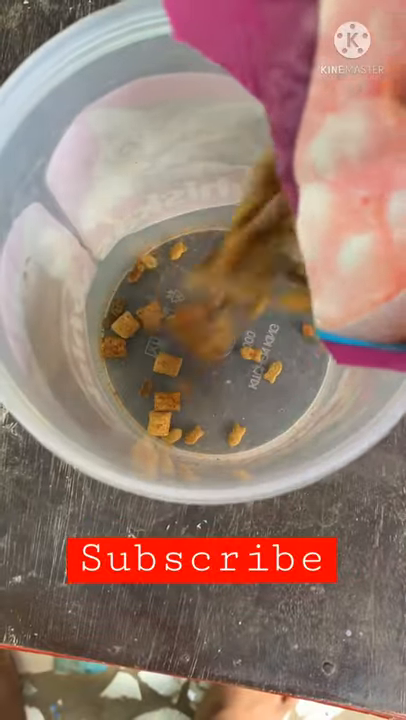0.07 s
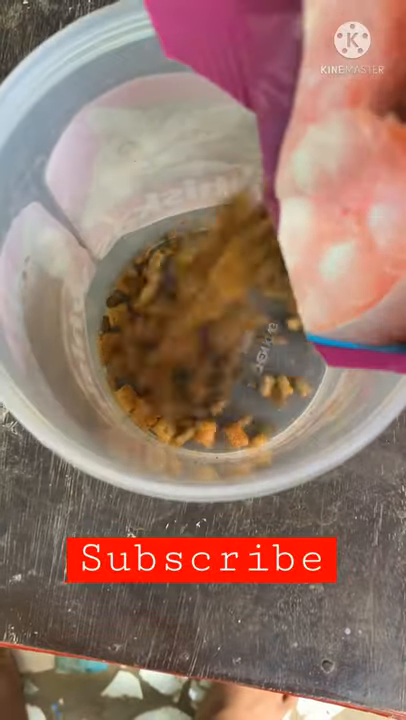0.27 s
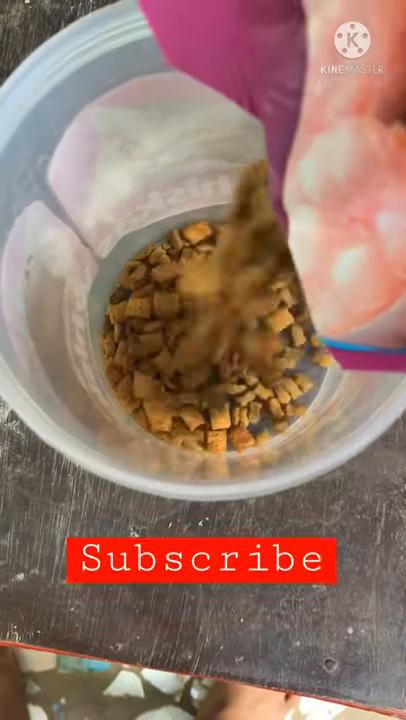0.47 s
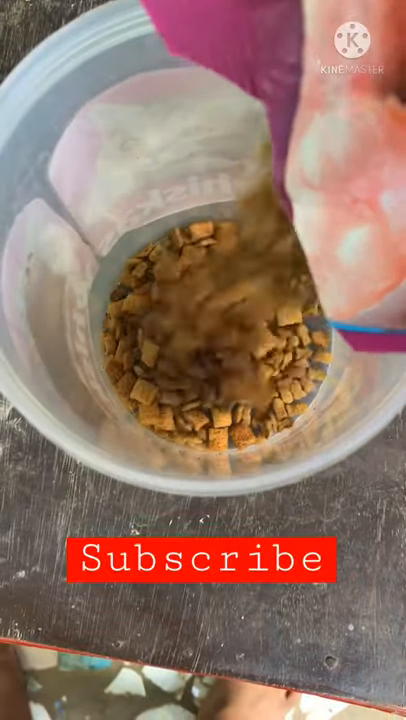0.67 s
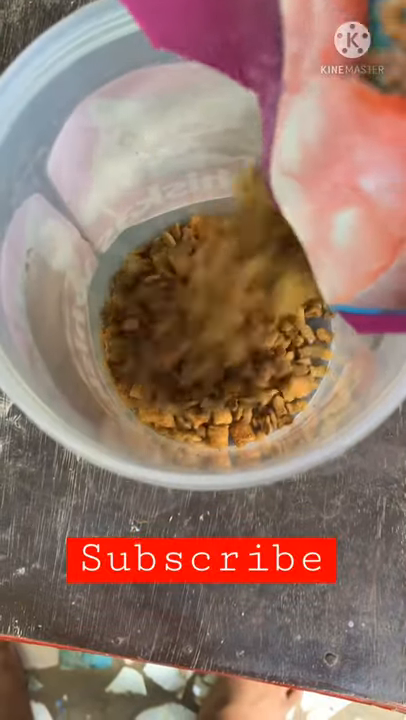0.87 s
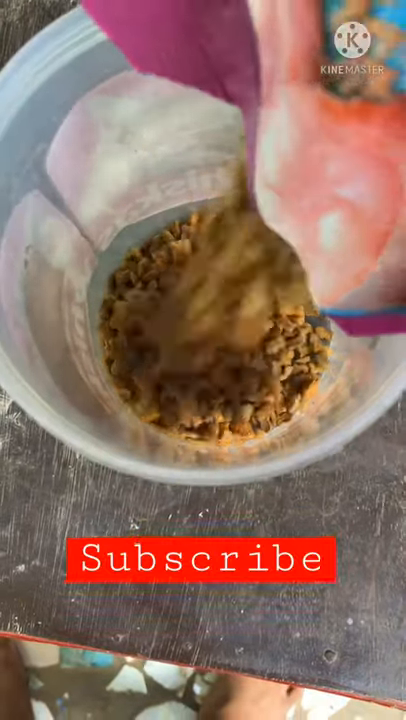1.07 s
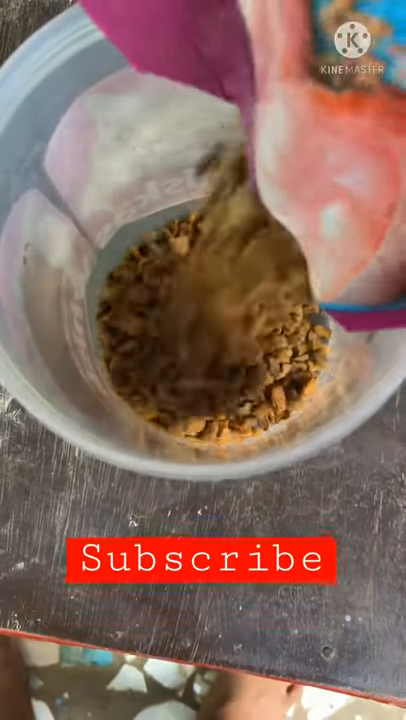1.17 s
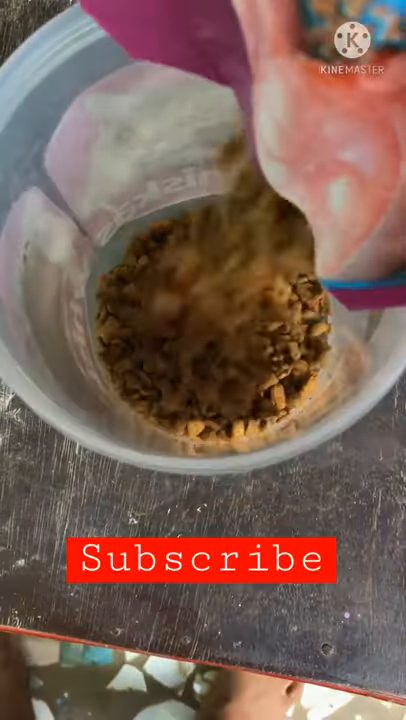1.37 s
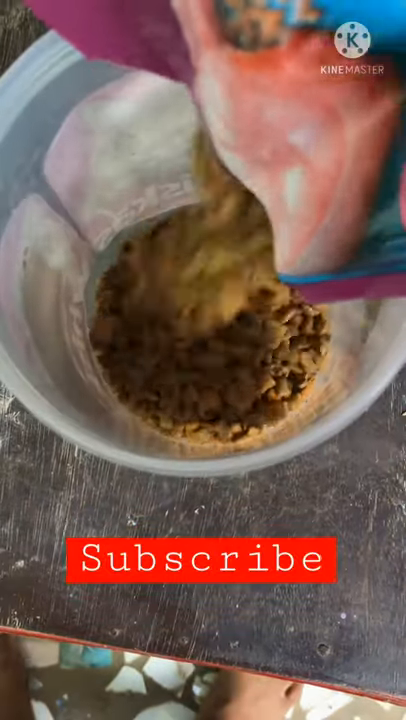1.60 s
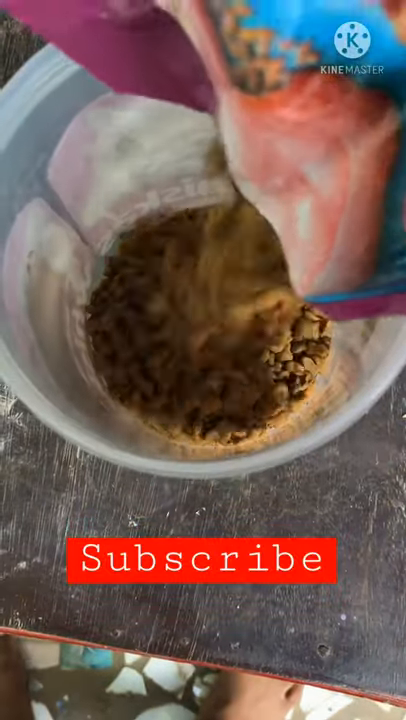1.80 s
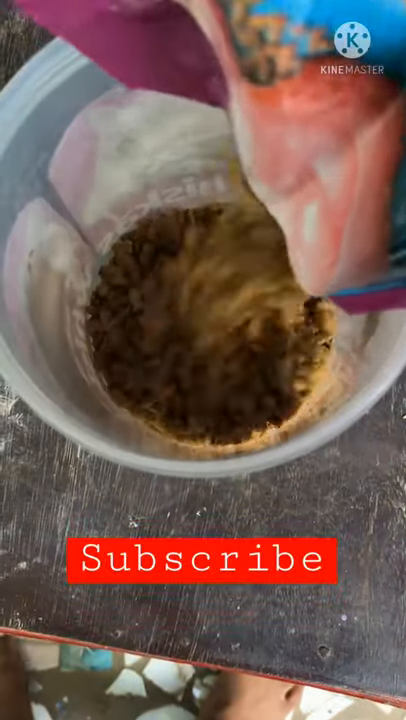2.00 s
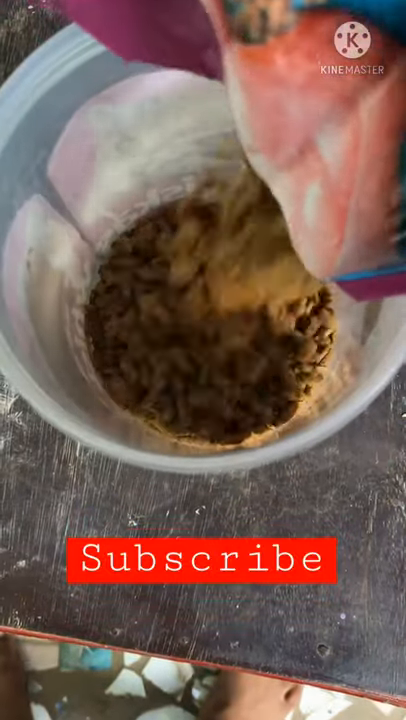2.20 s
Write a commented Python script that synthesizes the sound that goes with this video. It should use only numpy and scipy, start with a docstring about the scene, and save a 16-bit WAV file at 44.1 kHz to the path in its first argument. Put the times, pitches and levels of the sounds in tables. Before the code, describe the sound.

Dry pet food pours from a crinkling bag into an empty plastic tub, very close: first a loud hollow clatter on the bare floor, then a duller, dense patter of pieces clicking on the growing heap.

```python
"""Dry pet food into a plastic tub

Dry pet food pours from a bag into a plastic tub, close to the microphone. At first the pieces strike the
bare floor: damped modes ring and thump under noisy cracks. As a heap builds up the tub is muffled, and
the sound turns into a patter of coloured random contacts with short clicks of piece on piece. The bag
rumbles (filtered noise) and snaps, a wavering low tone comes and goes, and the loudest peaks overload."""
import sys
import numpy as np
from scipy import signal
from scipy.fft import rfft, irfft, next_fast_len
from scipy.io import wavfile
from scipy.ndimage import map_coordinates

SR = 44100
rng = np.random.default_rng(int(sys.argv[2]) if len(sys.argv) > 2 else 0)


def to_wav(s):
    """Save 16-bit WAV."""
    ch = np.atleast_2d(s).T  # columns
    pcm = np.round(np.clip(ch, -1, 1) * 32767)  # PCM
    wavfile.write(sys.argv[1], SR, pcm.astype(np.int16))


N = 99225  # samples, 2.25 s
AGE = np.arange(SR // 8) / SR  # seconds since the start of a single hit


def amp(db):
    """Decibels to gain."""
    return 10 ** (np.asarray(db) / 20)


def unit(x):
    """Scale to rms 1."""
    return x / np.sqrt(np.mean(x ** 2) + 1e-20)


def burst(x, size):
    """Scale a hit to rms 1 over its first samples."""
    return x / np.sqrt(np.mean(x[:size] ** 2) + 1e-20)


def level(rows):
    """Gain per sample from (time_s, level_db) points."""
    return amp(np.interp(np.arange(N) / SR, *np.transpose(rows)))


def fade(t60, attack=1e-5):
    """Quick rise and exponential decay, both times in seconds."""
    decay = np.exp(-np.log(1000) * AGE / t60)
    return decay * (1 - np.exp(-AGE / attack))


def add(track, s, sound):
    """Mix a sound into the track at a time in seconds."""
    i = int(np.clip(round(s * SR), 0, N))
    track[i:i + len(sound)] += sound[:N - i]


def response(points, size=4096):
    """Minimum-phase impulse response of a (freq_hz, gain_db) colour, built by folding its cepstrum."""
    hz, db = np.transpose(points)
    log_freq = np.log(np.fft.rfftfreq(size, 1 / SR) + 1)
    gain = amp(np.interp(log_freq, np.log(hz), db))
    cepstrum = irfft(np.log(gain))
    cepstrum[1:size // 2] *= 2
    cepstrum[size // 2 + 1:] = 0
    return irfft(np.exp(rfft(cepstrum)))


def through(x, answer):
    """Pass a sound through an impulse response."""
    return signal.fftconvolve(x, answer)[:len(x)]


def wobble(per_s):
    """A smooth random curve without extreme swings."""
    curve = map_coordinates(rng.standard_normal(N), [np.arange(N) * per_s / SR])
    return np.clip(curve, -2, 2)


def contacts(per_s, spread_db):
    """Random impulses of uneven size and either sign."""
    hit = rng.random(N) < per_s / SR
    sign = rng.choice([-1, 1], N)
    return hit * sign * amp(spread_db * np.clip(rng.standard_normal(N), -2, 2))


def scratch(t60, colour, rough_db=4, points_per_s=3000):
    """A rough edge touching: a short dying spray of noise, uneven in level and coloured."""
    roughness = map_coordinates(rng.standard_normal(len(AGE)), [AGE * points_per_s], order=1)
    noise = rng.standard_normal(len(AGE)) * amp(rough_db * roughness)
    return through(noise * fade(t60), colour)


def ping(hz, t60, attack):
    """One heavily damped ring, started at a random phase."""
    return np.sin(2 * np.pi * (hz * AGE + rng.random())) * fade(t60, attack)


# a low hum that swells and fades, perhaps the surface under the tub: time_s, level_db
HUM_LEVEL = [(.09, -51), (.14, -35.5), (.31, -36), (.36, -54), (.48, -40.5), (.65, -35.5), (.82, -54),
             (1.2, -41), (1.4, -53), (1.75, -40), (2.25, -58)]
HUM_HZ, HUM_WAVER_HZ = 128.4, 1.83


def hum():
    """One low tone, slightly unsteady in pitch."""
    pitch = HUM_HZ + HUM_WAVER_HZ * wobble(10.1)
    tone = np.sin(2 * np.pi * np.cumsum(pitch) / SR)
    return level(HUM_LEVEL) * unit(tone)


# food shifting in the handled bag: time_s, level_db
BAG_LEVEL = [(0, -32), (.09, -35), (.15, -29.5), (.35, -28), (.55, -39.5), (1.2, -31.5), (1.7, -34),
             (2.1, -31.5), (2.25, -32.5)]
# colour of that rumble: freq_hz, relative gain_db
RUMBLE_COLOUR = [(20, -6), (45, -6.5), (70, -2.5), (100, -8), (130, -5), (200, -3), (400, -9), (800, -9.5),
                 (1500, -11), (2500, -19.5), (6000, -33.5), (16000, -41)]
# sharp snaps, probably creases of the bag: start_s, level_db before the SNAP_DB trim, pitch_hz
SNAP_EVENTS = [(0.0602, -32.5, 8300), (0.0695, -40, 6950), (0.083, -42, 9660), (0.1044, -35.5, 10250),
               (.606, -20, 12800), (0.9953, -16.5, 8900), (1.0385, -19.5, 9150), (1.521, -22, 9100),
               (1.57, -21, 7200), (1.6921, -25, 7600), (1.961, -24.5, 9000), (1.995, -24, 12000),
               (2.092, -30, 11900)]
# colour of a snap's noise: freq_hz, relative gain_db
SNAP_COLOUR = [(200, -28), (1300, -3), (3000, 11), (6000, 2.5), (9000, -1), (15000, -7.5)]
SNAP_DB, SNAP_T60_S = 4.5, 0.002


def bag(ping_db=-5):
    """The bag rumbles as the food shifts; each snap is a scratch with a very short high ring."""
    rumble = through(rng.standard_normal(N), response(RUMBLE_COLOUR))
    out, colour = level(BAG_LEVEL) * unit(rumble), response(SNAP_COLOUR)
    for s, db, hz in SNAP_EVENTS:
        crackle = burst(scratch(0.015, colour), size=88)
        ring = burst(ping(hz, SNAP_T60_S, .0002), size=88)
        add(out, s, amp(db + SNAP_DB) * (crackle + amp(ping_db) * ring))
    return out


# dull knocks, probably the bag and clumps landing: start_s, level_db before lift_db, pitch_hz, t60_s
KNOCK_EVENTS = [(0.106, -24, 247, 0.023), (0.994, -11.5, 1310, 0.02), (1.511, -25, 1090, .012),
                (1.9982, -19.5, 1450, 0.0075), (2.001, -17, 850, 0.0085), (1.926, -38, 69, .18),
                (2.096, -35, 65, 0.16)]


def knocks(lift_db=5, skirt_db=-22, scuff_db=-4):
    """Short hollow bumps: a damped ring blurred by a scuff around the same pitch."""
    out = np.zeros(N)
    for s, db, hz, t60 in KNOCK_EVENTS:
        colour = [(hz / 2, skirt_db / 2), (hz, 0), (hz * 2, skirt_db / 2), (hz * 10, 2 * skirt_db)]
        scuff = scratch(t60, response(colour))
        scuff = scuff / np.abs(scuff).max()
        add(out, s, amp(db + lift_db) * (ping(hz, t60, t60 / 20) + amp(scuff_db) * scuff))
    return out


# pieces landing and sliding on the heap, also the base level of the small random clicks: time_s, level_db
HEAP_LEVEL = [(0, -30), (.2, -83), (.3, -27.5), (.8, -27.5), (1.1, -29), (1.4, -32.5), (1.7, -29.5),
              (1.98, -33), (2.07, -32.5), (2.25, -30.5)]
# colour of those pieces: freq_hz, relative gain_db
PATTER_COLOUR = [(100, -12.5), (250, 3.5), (420, -1), (580, 3.5), (800, -1.5), (1500, 2.5), (2200, -1.5),
                 (3000, 0.5), (4200, -7.5), (4950, -15.5), (5800, -4), (8000, -8), (10500, -11.5),
                 (15700, -14)]
PATTER_PER_S, PATTER_SPREAD_DB = 4000, 4
# fine crumbs sliding over each other and out of the bag: time_s, level_db
CRUMB_LEVEL = [(0, -69), (.2, -45.5), (.3, -28), (.78, -49), (.98, -38), (1.15, -31.5), (1.3, -33),
               (1.37, -29.5), (1.44, -32), (1.51, -34), (1.57, -30), (1.69, -32.5), (1.8, -34),
               (1.94, -31.5), (2.06, -35), (2.14, -31.5), (2.25, -30.5)]
# colour of the crumbs: freq_hz, relative gain_db
CRUMB_COLOUR = [(1000, -4), (3000, -44), (5700, 0), (7600, -6), (9300, 1.5), (10500, -2.5), (11700, 1.5),
                (13500, 3.5), (15700, -1.5)]
CRUMBS_PER_S, CRUMB_SPREAD_DB = 1100, 3.5


def patter(clump_db=3, clumps_per_s=200, crumb_clump_db=2):
    """Many tiny contacts of pieces and crumbs on the heap, swelling together in clumps."""
    clumps = wobble(clumps_per_s)
    piece_hits = contacts(PATTER_PER_S, PATTER_SPREAD_DB) * amp(clump_db * clumps)
    crumb_hits = contacts(CRUMBS_PER_S, CRUMB_SPREAD_DB) * amp(crumb_clump_db * clumps)
    pieces = unit(through(piece_hits, response(PATTER_COLOUR)))
    crumbs = unit(through(crumb_hits, response(CRUMB_COLOUR)))
    return level(HEAP_LEVEL) * pieces + level(CRUMB_LEVEL) * crumbs


# colour of hard piece edges touching: freq_hz, relative gain_db
CRACK_COLOUR = [(500, -12), (2000, 1), (4300, 7), (5000, 1), (5700, 4.5), (7500, 0), (8500, 2.5),
                (10400, -6.5), (11500, -2.5), (15500, -3.5)]


def crack(t60):
    """The noisy contact of a hard edge, shared by clicks, bounces and strikes."""
    return scratch(t60, response(CRACK_COLOUR))


REBOUND_S = .0025  # base delay of a second touch, scaled at random each time
# piece hitting piece on the heap: start_s, level_db before the CLICK_DB trim, pitch_hz
CLICK_EVENTS = [(0.9666, -12, 4360), (1.097, -30, 3290), (1.1513, -18, 3870), (1.178, -17.5, 5830),
                (1.2284, -16.5, 3850), (1.2349, -13, 3800), (1.248, -16.5, 3900), (1.2688, -31, 3920),
                (1.2826, -14, 4000), (1.2993, -25, 3800), (1.3517, -16, 5670), (1.3686, -18, 4350),
                (1.3846, -14.5, 3450), (1.387, -17.5, 3800), (1.413, -15, 3600), (1.4167, -14.5, 3900),
                (1.423, -20, 3950), (1.4465, -23, 4200), (1.453, -16, 3920), (1.4557, -17, 3980),
                (1.5027, -20.5, 4020), (1.5211, -16.5, 3800), (1.5494, -14.5, 3800), (1.5667, -26, 4370),
                (1.594, -17, 3650), (1.6037, -19, 3870), (1.614, -20, 3940), (1.63, -20, 3800),
                (1.6787, -15, 3900), (1.6935, -13.5, 5900), (1.7055, -23, 3720), (1.722, -22, 3730),
                (1.768, -22, 3900), (1.779, -25, 3870), (1.786, -16, 4060), (1.8273, -19, 3700),
                (1.855, -16.5, 3760), (1.8709, -17, 4120), (1.9074, -18, 4160), (1.9356, -13, 3620),
                (1.94, -15.5, 3830), (1.9625, -20, 3870), (1.9993, -22.5, 3130), (2.0916, -15.5, 3900),
                (2.142, -18.5, 3700), (2.1458, -20, 3720), (2.2381, -21, 3720), (2.2422, -20, 4030)]
CLICK_DB, CLICK_T60_S, CLICK_ATTACK_S = -0.5, 0.0027, .0004
# fainter clicks at random: mean rate, mean level relative to HEAP_LEVEL, middle pitch
SMALL_CLICKS_PER_S, SMALL_CLICK_DB, SMALL_CLICK_HZ = 320, -1, 3800


def clicks(crack_db=-9, spread_db=3, pitch_spread=0.19, again_db=-13):
    """Piece on piece: a few cycles of ring and a tick, then a lighter touch at another pitch."""
    out, heap = np.zeros(N), level(HEAP_LEVEL)
    rows = [(s, amp(db + CLICK_DB), hz) for s, db, hz in CLICK_EVENTS]
    for i in np.flatnonzero(rng.random(N) < SMALL_CLICKS_PER_S / SR):
        size, shift = np.clip(rng.standard_normal(2), -2, 2)
        gain = heap[i] * amp(SMALL_CLICK_DB + spread_db * size)
        rows.append((i / SR, gain, SMALL_CLICK_HZ * np.exp(pitch_spread * shift)))
    for s, gain, hz in rows:
        again_s = REBOUND_S * (.5 + 2 * rng.random())
        again_hz = hz * np.exp(pitch_spread * rng.uniform(-2.9, 1))
        for delay, db, pitch in ((0, 0, hz), (again_s, again_db, again_hz)):
            ring = burst(ping(pitch, CLICK_T60_S, CLICK_ATTACK_S), size=88)
            tick = burst(crack(.0045), size=88)
            add(out, s + delay, gain * amp(db) * (ring + amp(crack_db) * tick))
    return out


# modes of the tub before random variation and damping: freq_hz, relative level_db, t60_s
TUB_MODES = [(329, -7, 0.069), (411, 1.5, 0.069), (445, -9.5, 0.025), (608.6, -10.5, 0.074),
             (977, -19, 0.051), (1037, -18.5, 0.045), (1348, -15.5, 0.035), (1960, -2.5, 0.023),
             (2186, 5.5, 0.017), (2430, -3, 0.012), (2830, -2, 0.019), (3206, -1, 0.017), (3750, -4, 0.011),
             (4240, -6.5, 0.014)]
THUMP_BELOW_HZ = 800  # modes below thump, the others ring
RING_ATTACK_S, THUMP_ATTACK_S = 0.00087, 0.0003


def tub(low, attack, damping=1, vary_db=2.0, detune=0.0056):
    """The tub's low or high modes as decaying sines, excited differently at each spot."""
    out = np.zeros(len(AGE))
    for hz, db, t60 in TUB_MODES:
        if (hz < THUMP_BELOW_HZ) == low:
            size, shift, phase = rng.standard_normal(3)
            mode = np.sin(2 * np.pi * (hz * (1 + detune * shift) * AGE + phase))
            out += amp(db + vary_db * size) * fade(t60 / damping, attack) * mode
    return out


# small pieces bouncing on the floor that is still bare: time_s, level_db
BOUNCE_LEVEL = [(.215, -67), (.25, -21.5), (.34, -18.5), (.41, -22), (.45, -11), (.49, -19.5), (.7, -25.5),
                (.86, -27), (1.05, -28), (1.2, -39), (1.6, -51), (2.25, -63)]
# the tub's low boom under the falling stream: time_s, level_db
BOOM_LEVEL = [(0, -45), (.2, -52), (.33, -30), (.6, -29), (1, -33), (1.3, -31), (1.5, -37), (2.25, -41)]
BOUNCES_PER_S, BOUNCE_SPREAD_DB = 700, 5.5


def bounces(crack_db=-4, count=12):
    """Lighter rebounds at several spots of the floor, over the boom of the tub's low modes."""
    rattle, boom = np.zeros(N), np.zeros(N)
    for spot in range(count):
        taps = contacts(BOUNCES_PER_S / count, BOUNCE_SPREAD_DB)
        rattle += unit(through(taps, tub(False, RING_ATTACK_S, damping=0.99, detune=0.033)))
        rattle += amp(crack_db) * unit(through(taps, crack(0.0025)))
        boom += unit(through(taps, tub(True, THUMP_ATTACK_S)))
    return level(BOUNCE_LEVEL) * unit(rattle) + level(BOOM_LEVEL) * unit(boom)


# pieces striking the tub floor, levels before the trims below:
# start_s, floor ring_db, tub thump_db, contact crack_db
STRIKE_EVENTS = [(0.22, -8.5, -21, -13.5), (0.228, -4, -13.5, -18), (0.246, -7, -20.5, -13.5),
                 (0.253, -13, -19.5, -13), (0.267, -3.5, -23, -9.5), (0.273, -10, -25, -16),
                 (0.283, -14, -22, -15), (0.291, -4, -36, -18), (0.297, -21, -18, -10),
                 (0.303, -17, -20.5, -22), (0.324, -13, -48, -13), (0.332, -5.5, -23.5, -11),
                 (0.34, -10, -39, -8.5), (0.347, -9.5, -15, -13.5), (0.354, -7.5, -20, -12.5),
                 (0.364, -13, -39, -18.5), (0.371, -33, -46, -18), (0.381, -6.5, -18.5, -11),
                 (0.388, -9, -27, -18), (0.404, -17, -35, -29), (0.428, -12, -35, -22),
                 (0.439, -10, -22, -11.5), (0.446, -7.5, -15, -15), (0.452, -7, -15, -16),
                 (0.461, -13, -37, -23), (0.482, -17, -32, -21), (0.506, -19, -29, -26),
                 (0.518, -16, -27, -12.5), (0.526, -14.5, -17.5, -19), (0.536, -15, -24, -19),
                 (0.562, -17, -23, -35), (0.581, -14.5, -32, -14.5), (0.596, -19, -25, -15.5),
                 (0.625, -14.5, -28, -19), (0.653, -14, -39, -18), (0.664, -8.5, -13, -17),
                 (0.683, -10, -23, -10), (0.694, -15, -18, -16), (0.719, -17, -19, -17.5),
                 (0.741, -12, -31, -18), (0.751, -16, -21, -21), (0.766, -18, -26, -36),
                 (0.7981, -11.5, -16.5, -16), (0.81, -14, -18, -14), (0.824, -18, -28, -23),
                 (0.833, -17, -34, -20.5), (0.889, -23.5, -32, -22), (0.924, -15.5, -19.5, -26),
                 (0.954, -21, -20.5, -17.5), (0.983, -28, -25.5, -22), (1.04, -20, -21, -32.5),
                 (1.079, -36, -20.5, -26.5)]
RING_DB, THUMP_DB, CRACK_DB = -3.5, -1.5, -1
CRACK_T60_S = 0.014  # on the bare floor
# the growing heap shortens the floor's ring and deadens the rebounds
DAMPING_PER_S, REBOUND_LOSS_DB_PER_S = 0.62, 4.5
REBOUND_DB = -2.5  # at the first strike


def strikes():
    """Each hard landing cracks, rings the floor and thumps the tub; the piece tips over and touches again."""
    out = np.zeros(N)
    for s, ring_db, thump_db, crack_db in STRIKE_EVENTS:
        poured_s = s - STRIKE_EVENTS[0][0]
        damping = 1 + DAMPING_PER_S * poured_s
        thump = burst(tub(True, THUMP_ATTACK_S), size=480)
        add(out, s, amp(thump_db + THUMP_DB) * thump)
        again_s = REBOUND_S * (.5 + rng.random())
        again_db = REBOUND_DB - REBOUND_LOSS_DB_PER_S * poured_s
        for delay, db in ((0, 0), (again_s, again_db)):
            ring = burst(tub(False, RING_ATTACK_S, damping, vary_db=3.0, detune=.02), size=265)
            edge = burst(crack(CRACK_T60_S / damping), size=220)
            touch = amp(ring_db + RING_DB) * ring + amp(crack_db + CRACK_DB) * edge
            add(out, s + delay, amp(db) * touch)
    return out


WALLS_T60_S, WALLS_DB = 0.037, -12
WALLS_STEP = SR // 12  # samples between fresh echo tails


def wall_echo(dry):
    """Brief echo between the tub's walls: a dying noise tail, drawn anew for each short stretch."""
    echo = np.zeros(N)
    for i in range(0, N, WALLS_STEP):
        tail = rng.standard_normal(len(AGE)) * fade(WALLS_T60_S, 0.004)
        add(echo, i / SR, signal.fftconvolve(dry[i:i + WALLS_STEP], tail / np.linalg.norm(tail)))
    return amp(WALLS_DB) * echo


def scene():
    """Bag, food and tub with the echo of its walls, over the hum that stays free of echo."""
    dry = bag() + knocks() + patter() + clicks() + bounces() + strikes()
    return (hum() + dry + wall_echo(dry))[None]


LOW_CUT_HZ, TOP_HZ = 55, 15850


def record(dry):
    """The microphone thins the deepest bass, the loudest peaks overload, and the top is cut off."""
    low_cut = signal.butter(3, LOW_CUT_HZ, "high", fs=SR, output="sos")
    thin = signal.sosfilt(low_cut, dry)
    clipped = thin / (1 + np.abs(thin) ** 6) ** (1 / 6)  # smooth limit at full scale
    size = next_fast_len(N + SR // 2)
    passed = np.fft.rfftfreq(size, 1 / SR) < TOP_HZ
    return irfft(rfft(clipped, size) * passed, size)[:, :N]


dry = scene()
out = record(dry)
to_wav(out)
```